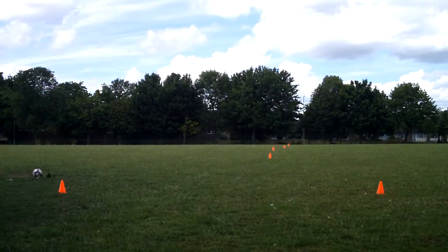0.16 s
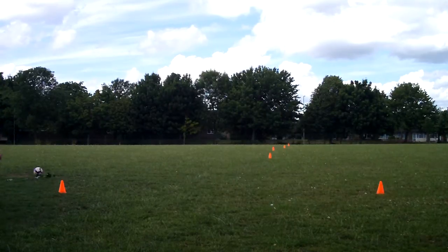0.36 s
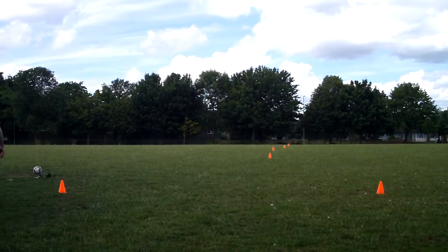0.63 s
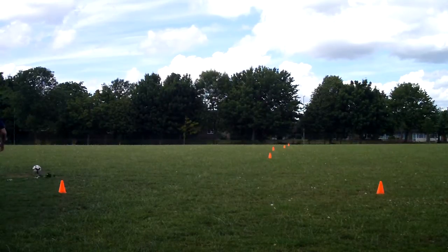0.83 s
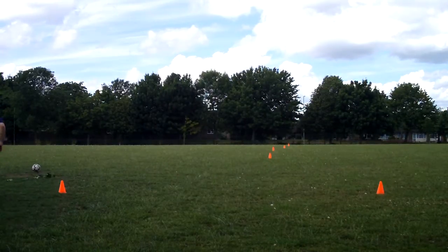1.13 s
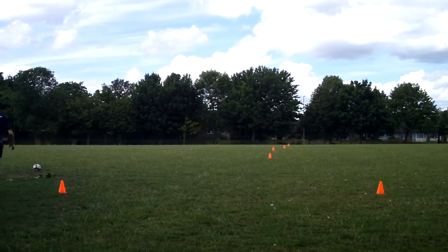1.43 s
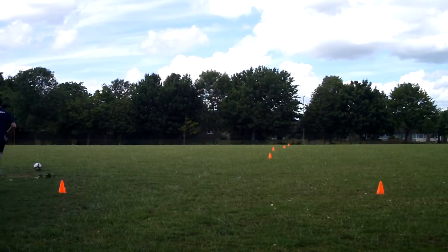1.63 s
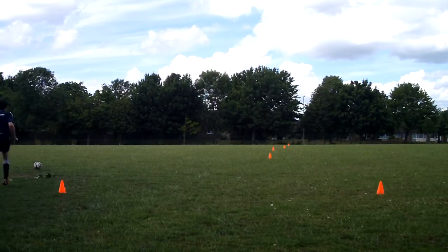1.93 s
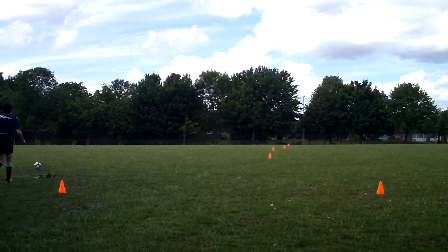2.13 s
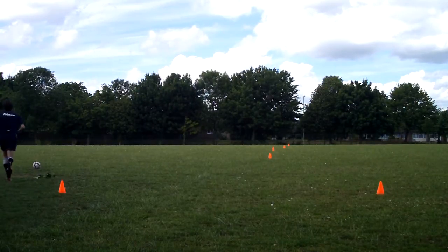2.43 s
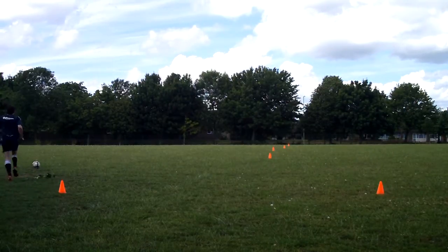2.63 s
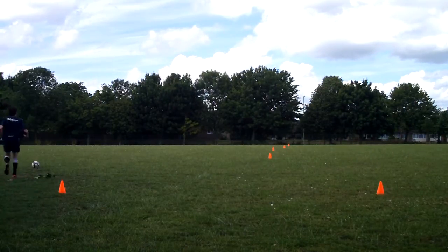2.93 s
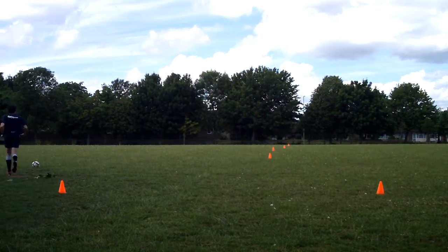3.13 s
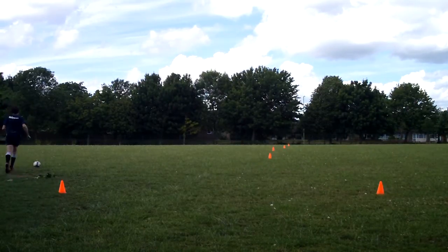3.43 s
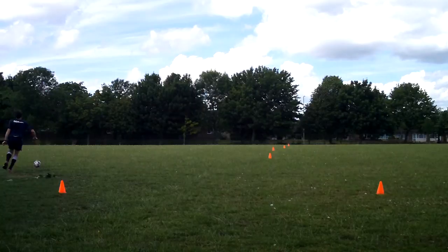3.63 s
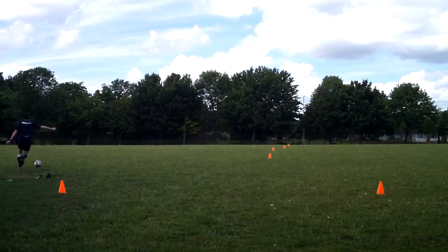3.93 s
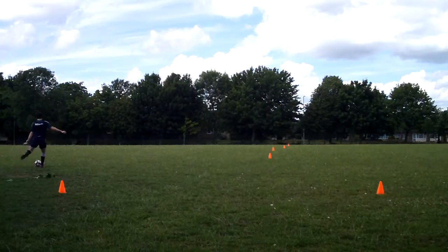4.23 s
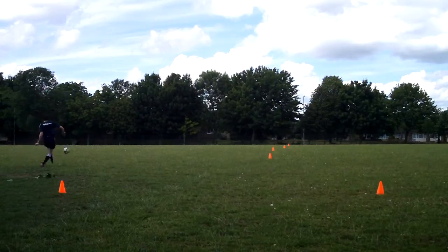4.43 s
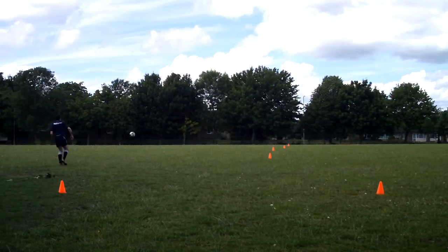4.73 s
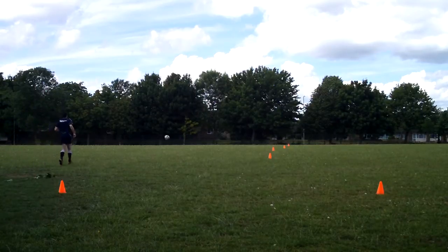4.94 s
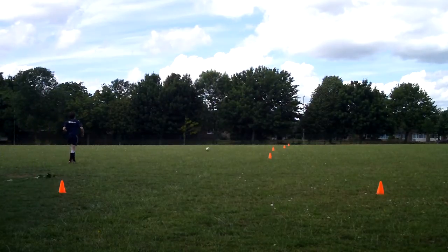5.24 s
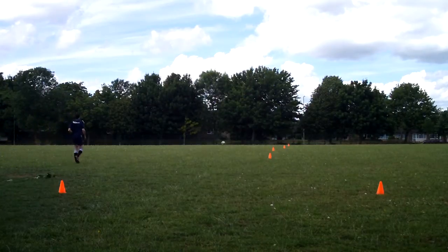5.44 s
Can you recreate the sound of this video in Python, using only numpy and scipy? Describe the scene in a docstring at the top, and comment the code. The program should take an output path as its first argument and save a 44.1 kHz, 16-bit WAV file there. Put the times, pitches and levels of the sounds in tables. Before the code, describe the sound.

Low wind buffets a microphone in an open field, a small bird sings a short phrase, then a ball is kicked with a sharp smack.

```python
"""An open grass field: wind rumbles and flutters on a camera's microphone, shaped noise for a far road
and leaves hisses, an engine drones as a sinking tone, and the camera adds hiss, thin whines, ticks and rasps.
Gusts soon thump, as dying low swings. A small bird then sings one phrase of swept tones: chirps, a whistle,
a trill and a falling warble. Last, a ball is kicked some way off: a push of air, slapped skin and ringing air,
with echoes off the trees."""
import sys
import numpy as np
from scipy import signal
from scipy.fft import rfft, irfft, next_fast_len
from scipy.io import wavfile
from scipy.ndimage import uniform_filter1d, map_coordinates

SR = 44100
rng = np.random.default_rng(int(sys.argv[2]) if len(sys.argv) > 2 else 0)


def rack_gain(trim_db):
    """Turn a fader trim in dB into the linear factor to multiply a signal by."""
    fader = np.asarray(trim_db, float)
    return 10 ** (fader / 20)


def put_to_file(sound):
    """Save the sound as 16-bit audio at rate SR, in the file named by the first command-line argument."""
    columns = np.atleast_2d(sound).T  # one column per channel
    safe = np.clip(columns, -1, 1)
    whole_steps = np.round(safe * 32767)
    wavfile.write(sys.argv[1], SR, whole_steps.astype(np.int16))


N = 245637
T = np.arange(N) / SR  # time of every sample [s]
FRAME_RATE = 29.97  # pictures per second


def unit(x):
    """Scales a sound to rms 1."""
    return x / np.sqrt(np.mean(x ** 2) + 1e-20)


def along(points, hz):
    """Reads a curve of (Hz, value) points on a log frequency axis."""
    point_hz, value = np.transpose(points)
    return np.interp(np.log(hz + 1), np.log(point_hz + 1), value)


def curves(rows):
    """Gives one value per sample for each column after the time."""
    s, *columns = np.transpose(rows)
    return [np.interp(T, s, column) for column in columns]


def between(rows):
    """Is true from the first to the last time of a table."""
    return (T > rows[0][0]) * (T < rows[-1][0])


def wobble(rate):
    """Makes a smooth random curve with this many random points a second (30 at most)."""
    return map_coordinates(rng.standard_normal(200), [T * rate])


def filtered(x, response):
    """Multiplies the spectrum of x by a response, a function of frequency."""
    m = next_fast_len(N + SR // 2)  # room for the ringing, so that it does not wrap round
    return irfft(rfft(x, m) * response(np.fft.rfftfreq(m, 1 / SR)), m)[..., :N]


def rush(spectrum, patchy_db):
    """Makes noise of rms 1 with a given spectrum and smooth random patches of gain in time and pitch."""
    z = signal.stft(rng.standard_normal(N), nperseg=512)[2]
    field = uniform_filter1d(rng.standard_normal(z.shape), size=5, axis=0)
    field = uniform_filter1d(field, size=10, axis=1)
    noise = signal.istft(z * rack_gain(patchy_db * unit(field)), nperseg=512)[1][:N]
    return unit(filtered(noise, lambda hz: rack_gain(along(spectrum, hz))))


def tone(hz):
    """Makes a sine of rms 1 that follows a pitch curve."""
    return np.sqrt(2) * np.sin(2 * np.pi * np.cumsum(hz) / SR)


def band(hz, centre_hz, width_hz):
    """Gives the response of one resonance, which rings only after it is struck."""
    return 1j * hz * width_hz / (centre_hz ** 2 - hz ** 2 + 1j * hz * width_hz)


def modes(hz, table):
    """Adds several resonances side by side, with alternating signs."""
    return sum((-1) ** k * rack_gain(db) * band(hz, centre, width)
               for k, (centre, width, db) in enumerate(table))


def add(out, s, sound):
    """Mixes a sound into out at a time in seconds."""
    part = out[round(s * SR):][:len(sound)]
    part += sound[:len(part)]


def note(db, length, start_hz, mid_hz, end_hz):
    """Sings one swept note that swells to a peak level and fades."""
    u = np.linspace(0, 1, round(length * SR))
    sweep = np.polyval(np.polyfit([0, .5, 1], [start_hz, mid_hz, end_hz], 2), u)
    return rack_gain(db) * np.sin(np.pi * u) ** 1.1 * tone(sweep) / np.sqrt(2)


def rumble():
    """Turbulent wind on the microphone's port makes a deep, lumpy noise."""
    # level of the rumble: (time [s], level [dB])
    levels = [(0.0, -42), (0.26, -28), (0.33, -40), (0.53, -20.5), (0.63, -26.5), (0.71, -42), (0.93, -31),
              (1.1, -33), (1.5, -38.5), (1.66, -31), (1.83, -36.5), (2.39, -33), (2.96, -40.5), (3.18, -35),
              (4.0, -38.5), (4.47, -35.5), (5.03, -33.5), (5.2, -36), (5.57, -36)]
    # its spectrum: (frequency [Hz], relative density [dB per Hz])
    deep_spectrum = [(1.8, -38), (3.0, -7.5), (22, 4), (48, -0.5), (62, -22), (110, -120)]
    db, = curves(levels)
    return rack_gain(db) * rush(deep_spectrum, patchy_db=0.5)


def flutter():
    """The same wind flutters at a higher pitch, with quick random changes of level."""
    # level of the flutter: (time [s], level [dB])
    levels = [(0, -38.5), (.53, -36), (.71, -39), (.93, -35), (1.1, -44), (1.38, -36.5), (1.55, -40.5),
              (2.2, -38), (2.9, -40.5), (3.18, -37.5), (4.0, -42), (5.03, -43), (5.57, -40)]
    # its spectrum: (frequency [Hz], relative density [dB per Hz])
    flutter_spectrum = [(25, -51), (42, 0), (68, 0), (87, -9.5), (129, -12.5), (227, -22.5), (260, -23),
                        (340, -41), (570, -120)]
    db, = curves(levels)
    return rack_gain(db) * unit(rack_gain(1.07 * wobble(14)) * rush(flutter_spectrum, patchy_db=0.16))


def tyres():
    """Tyres on a far road roar as noise round 1 kHz and below."""
    # spectrum of the roar: (frequency [Hz], relative density [dB per Hz])
    tyre_spectrum = [(120, -14.5), (200, -4.5), (307, -5.5), (373, -7), (469, -7.5), (635, -9), (992, -4.5),
                     (1500, -12.5), (1950, -34.5), (3300, -120)]
    return rack_gain(-48.4 + 0.46 * wobble(2.98)) * rush(tyre_spectrum, patchy_db=0.67)


def leaves():
    """Leaves rustle as brighter noise and calm down steadily."""
    # spectrum of the rustle: (frequency [Hz], relative density [dB per Hz])
    leaf_spectrum = [(820, -17), (1400, -9), (1570, -3), (1860, 0), (3250, -11), (4010, -11.5), (5500, -22),
                     (7150, -40), (12100, -120)]
    start_db, fade_db_per_s = -52.5, 1.09
    db = start_db - fade_db_per_s * T + 0.79 * wobble(3.5)
    return rack_gain(db) * rush(leaf_spectrum, patchy_db=.6)


def engine():
    """A passing engine is one low tone whose pitch sinks as it drives away."""
    # the drone: (time [s], pitch [Hz], level before a small wobble [dB])
    drone = [(0, 91, -54), (1.4, 90.8, -46.5), (2, 87.6, -49), (2.5, 84, -46.5), (3, 82.4, -75)]
    hz, db = curves(drone)
    return rack_gain(db + 1.5 * wobble(2.92)) * tone(hz) * (T < drone[-1][0])


def hiss():
    """The two amplifiers hiss: shared noise plus noise of opposite sign sets how alike they are."""
    # spectrum of the hiss: (frequency [Hz], relative density [dB per Hz])
    hiss_spectrum = [(3060, -25.5), (5200, -4.5), (7430, -3.5), (7600, -3), (8060, -4), (8280, -5),
                     (12300, -7.5), (13800, -11), (14500, -8), (15300, -11.5)]
    # likeness of left and right: (frequency [Hz], correlation [-1 to 1])
    alike = [(1500, 0.23), (3000, 0.24), (6000, 0.85), (10000, 0.88), (15000, 0.6)]

    def turn(hz):
        return np.arccos(np.clip(along(alike, hz), -1, 1)) / 2

    mid = filtered(rush(hiss_spectrum, patchy_db=1.5), lambda hz: np.cos(turn(hz)))
    side = filtered(rush(hiss_spectrum, patchy_db=2.5), lambda hz: np.sin(turn(hz)))
    return rack_gain(-64.5) * np.array([mid + side, mid - side])


def whines():
    """The camera whines on steady tones, and on a high one that swells twice a picture frame."""
    # the steady tones: (pitch [Hz], level before a small wobble [dB rms])
    whine_tones = [(7494, -89), (7867, -74), (9000, -89), (10000, -92), (12000, -90)]
    steady = sum(rack_gain(db + 0.72 * wobble(4.8)) * tone(np.full(N, hz)) for hz, db in whine_tones)
    frame = T * FRAME_RATE % 1  # how far through the picture frame, 0 to 1
    first = np.exp(-((frame - .28) / .1) ** 2)
    second = 1.25 * np.exp(1.9j - ((frame - .79) / .16) ** 2)  # 1.9 radians out of step
    carrier = np.exp(2j * np.pi * 500 * FRAME_RATE * T)
    return steady + rack_gain(-72) * np.imag((first + second) * carrier)


def frame_ticks():
    """The camera ticks once per picture frame: a click of slightly random size rings briefly."""
    # what a tick rings with: (frequency [Hz], width [Hz], level [dB])
    tick_modes = [(9240, 350, 3), (12500, 1500, -16), (13800, 1500, -18)]
    beat = np.arange(.012, T[-1], 1 / FRAME_RATE)
    clicks = np.zeros(N)
    clicks[np.round(beat * SR).astype(int)] = rack_gain(-32.5 + 2 * rng.standard_normal(len(beat)))
    return filtered(clicks, lambda hz: modes(hz, tick_modes))


def rasps():
    """The camera rasps: short dying noises through a high, narrow band, faint ones near a steady beat."""
    # the clearest rasps: (time [s], noise level before fading and filtering [dB])
    buzzes = [(0.7951, -48), (0.8869, -47), (1.2885, -49), (1.5863, -49), (1.8896, -46), (3.9439, -47),
              (4.9001, -49)]
    steps = np.arange(.092, T[-1], .1)
    late, size = rng.standard_normal((len(steps), 2)).T
    faint = list(zip(steps + .006 * late, -54 + 2.5 * size))
    out, t = np.zeros(N), T[:SR // 20]
    for s, db in faint + buzzes:
        shape = rack_gain(db - 60 * t / 0.1) * (1 - np.exp(-t / 0.002))
        add(out, s, shape * rng.standard_normal(len(t)))
    return filtered(out, lambda hz: band(hz, 10940, 1100) ** 2)


def gusts():
    """Gusts suck the microphone's membrane out and let it swing back, dying away."""
    # the thumps: (time [s], push before build-up and decay [dB], swing [Hz])
    thumps = [(0.507, -1.5, 29.8), (.579, -17, 60), (.588, -19.5, 154), (.597, -17, 87), (0.634, -14, 18.2),
              (0.694, -9, 26.6), (1.575, -15.5, 62), (1.97, -12, 12.2)]
    swings_to_die = 4.2  # swings until a thump has lost 60 dB
    out, t = np.zeros(N), T[:SR // 2]
    for s, db, hz in thumps:
        soft = 1 - np.exp(-(t * hz / .3) ** 2)  # the push builds over part of a swing
        decay = rack_gain(db - 60 * t * hz / swings_to_die)
        add(out, s, -decay * soft * np.sin(2 * np.pi * hz * t))
    return out


def chirps():
    """The bird gives short rising chirps; the last, slightly falling row is the faint tail of the
    trill's final upstroke."""
    # the notes: (time [s], middle pitch [Hz], rise, or fall if negative [Hz], peak level [dB])
    chirp_notes = [(1.696, 5250, 100, -64), (1.969, 4780, 1200, -53), (2.139, 6000, 240, -50.5),
                   (2.203, 4500, 510, -63), (2.486, 5100, 750, -58), (2.519, 3455, 980, -53),
                   (2.592, 4100, 500, -59), (3.29, 5450, -100, -63)]
    out = np.zeros(N)
    for s, hz, rise_hz, db in chirp_notes:
        add(out, s, note(db, .02, hz - 0.59 * rise_hz, hz, hz + .4 * rise_hz))
    return out


def whistle():
    """The bird holds one whistle, a tone with slight random changes of pitch and level."""
    # the whistle: (time [s], pitch [Hz], level [dB rms]), before those changes
    held_note = [(2.255, 5950, -75), (2.275, 6120, -57), (2.295, 6270, -59), (2.385, 6240, -62),
                 (2.395, 6230, -70), (2.425, 6230, -72), (2.48, 6230, -84)]
    hz, db = curves(held_note)
    return rack_gain(db + 2.5 * wobble(30)) * tone(hz + 15 * wobble(30)) * between(held_note)


def trill():
    """The bird repeats a figure of three notes: a tick, an upstroke and a downstroke."""
    # the figures: (time [s], tick peak [dB], upstroke length [s], upstroke peak [dB], downstroke peak [dB])
    figures = [(2.654, -54, .019, -54, -49), (2.772, -54, .018, -51, -48), (2.891, -53.5, .018, -53, -46),
               (3.008, -65, 0.023, -51.5, -45.5), (3.129, -64, .026, -54, -42.5),
               (3.243, -56, .017, -54, -43.5)]
    # the tick: (length [s], start pitch [Hz], middle pitch [Hz], end pitch [Hz])
    tick_note = (.014, 8000, 6650, 6600)
    up_end_s, up_end_hz, up_hz_per_s = .045, 5810, 46000  # where each upstroke ends, and its slope
    out = np.zeros(N)
    for s, tick_db, up_s, up_db, down_db in figures:
        add(out, s, note(tick_db, *tick_note))
        rise_hz = up_hz_per_s * up_s
        up = note(up_db, up_s, up_end_hz - rise_hz, up_end_hz - 0.46 * rise_hz, up_end_hz)
        add(out, s + up_end_s - up_s, up)
        add(out, s + 0.057, note(down_db, length=.026, start_hz=3960, mid_hz=3500, end_hz=2800))
    return out


def warble():
    """The bird closes with a falling, quickening warble, loudest as each swing turns upward."""
    # the flourish: (time [s], centre pitch [Hz], level before the swings [dB rms])
    flourish = [(3.387, 6500, -75), (3.4, 6400, -61), (3.425, 5650, -62), (3.445, 4830, -58),
                (3.47, 4200, -58), (3.495, 3740, -54.5), (3.522, 3300, -57.5), (3.54, 3050, -68)]
    hz, db = curves(flourish)
    since = T - flourish[0][0]
    swings_per_s, quicken_per_s2 = 70, 200
    turn = 2 * np.pi * since * (swings_per_s + quicken_per_s2 * since / 2)
    swing_hz = 680 * (hz / 6400) ** 2  # the swing shrinks with the square of the pitch
    level = rack_gain(db + 4.7 * np.cos(turn - .7) + 2.5 * wobble(30))
    return level * tone(hz - swing_hz * np.cos(turn)) * between(flourish)


def kick():
    """The boot slaps the skin and squashes the ball, which swings once and flies off ringing."""
    # the slapped skin: (frequency [Hz], width [Hz], level [dB])
    skin = [(1930, 380, -2), (3230, 600, -5), (5030, 900, -3), (6860, 410, -4.5), (8250, 550, -4),
            (11900, 430, -11), (13500, 1100, -19)]
    # air inside the ball: (frequency [Hz], level on contact [dB], level on release [dB], time to lose 60 dB [s])
    air = [(388, -18.5, -43, .014), (687, -24, -22.5, 0.01), (865, -35, -33, 0.01)]
    kick_s, contact_s = 4.4936, .0151  # moment of the kick, time on the boot
    t, out, slap = T[:SR // 10], np.zeros(N), np.zeros(N)
    let_go = 1 + np.exp(np.clip((t - contact_s) / .0006, -50, 50))
    held = (1 - np.exp(-(t / .0008) ** 2)) / let_go
    swing = 2 * np.pi * 91 * (t - .001) * (1 - 7 * t)  # slows as the ball rounds out again
    push = np.exp(-((t - .0065) / .01) ** 2) * held  # deepest mid-contact
    add(out, kick_s, -rack_gain(-9) * push * np.cos(swing))
    fade = rack_gain(-60 * t / .009) + rack_gain(-23 - 60 * t / .09)  # a quick fade and a faint slower one
    add(slap, kick_s, (1 - np.exp(-(t / .0006) ** 2)) * fade * rng.standard_normal(len(t)))
    out += rack_gain(-11) * filtered(slap, lambda hz: modes(hz, skin))
    for hz, contact_db, release_db, t60 in air:
        ring = rack_gain(-60 * t / t60) * np.sin(2 * np.pi * hz * t)
        add(out, kick_s + 0.0003, -rack_gain(contact_db) * ring)
        add(out, kick_s + contact_s, rack_gain(release_db) * ring)
    return out


def echoes(blow):
    """Leaves and trunks return delayed copies of the kick, with little bass or treble."""
    # the returns: (delay [s], level before filtering [dB])
    returns = [(.035, -15.5), (.052, -21), (.12, -26)]
    late = sum(rack_gain(db) * np.pad(blow, (round(s * SR), 0))[:N] for s, db in returns)
    return filtered(late, lambda hz: band(hz, 900, 4000))


def trees():
    """The tree line answers diffusely, as noise in which each frequency dies at its own speed."""
    # how long the answer lasts: (frequency [Hz], time to lose 60 dB [s])
    tree_decay = [(100, 0.12), (1000, 0.32), (8000, 0.13)]
    hz, t, z = signal.stft(rng.standard_normal(SR // 2), SR, nperseg=256)
    fade = rack_gain(-60 * t / along(tree_decay, hz)[:, None])
    tail = signal.istft(z * fade, SR, nperseg=256)[1]
    return tail / np.linalg.norm(tail)


def scene():
    """Bird and kick reach the single microphone directly and again off the trees."""
    wind = rumble() + flutter() + gusts()
    distance = tyres() + leaves() + engine()
    camera = whines() + frame_ticks() + rasps()
    song = chirps() + whistle() + trill() + warble()
    blow = kick()
    far = signal.fftconvolve(rack_gain(-11.0) * song + echoes(blow), trees())[:N]
    return song + blow + far + wind + distance + camera + hiss()


def band_limit(x):
    """A steep low-pass at the top of the band."""
    return signal.sosfilt(signal.butter(12, 16490, fs=SR, output="sos"), x)


def record(dry):
    """The camera cuts the top treble, and its two amplifiers add a standing voltage each."""
    # standing voltage, a row each for left and right: (offset [full scale = 1])
    offset = [
        [-.0816],
        [.0774],
    ]
    top_hz = 15150
    kept = filtered(dry, lambda hz: np.where(hz < top_hz, 1, rack_gain(-45)))
    return band_limit(kept + offset)


dry = scene()
out = record(dry)
put_to_file(out)
```